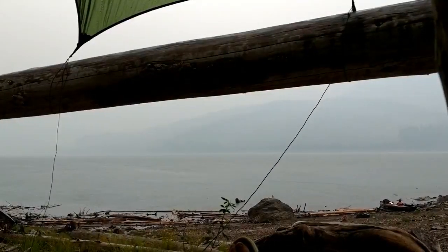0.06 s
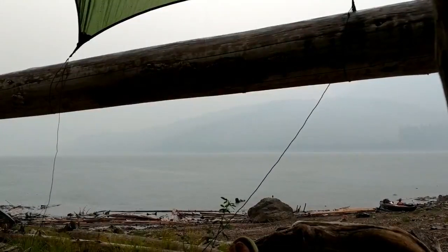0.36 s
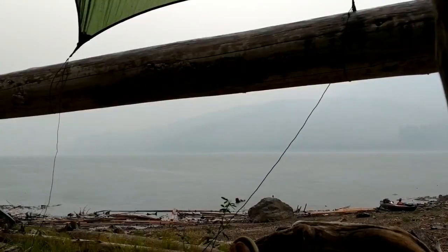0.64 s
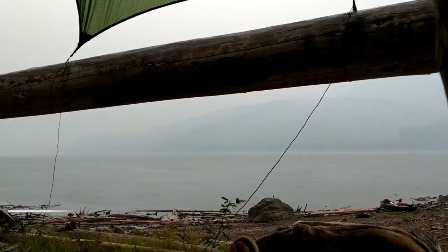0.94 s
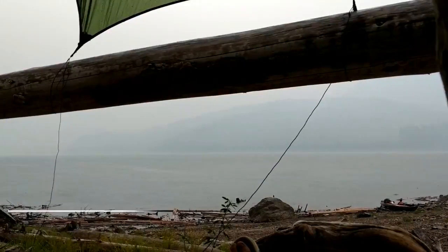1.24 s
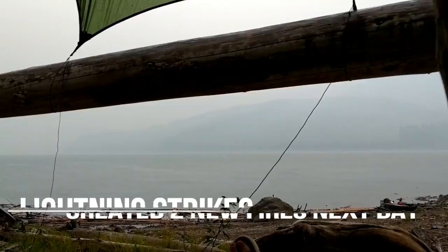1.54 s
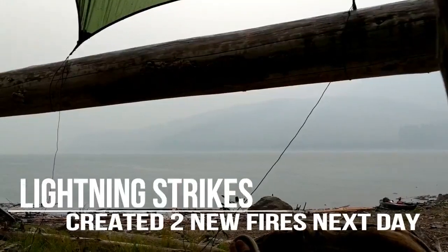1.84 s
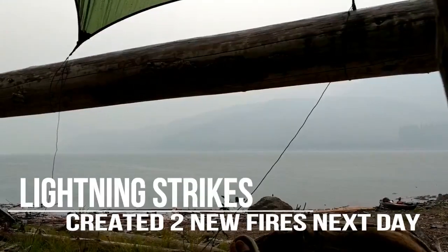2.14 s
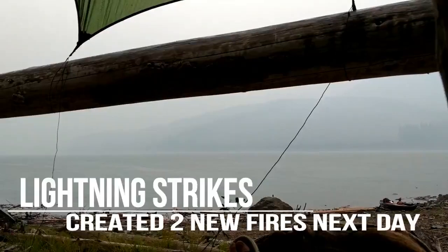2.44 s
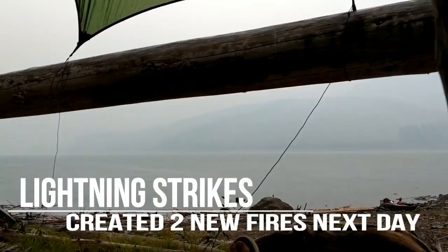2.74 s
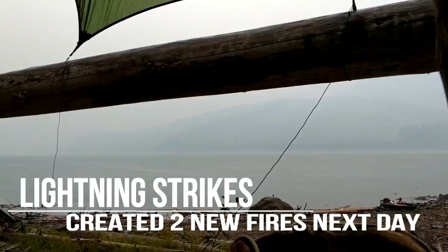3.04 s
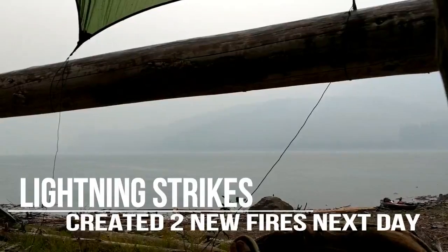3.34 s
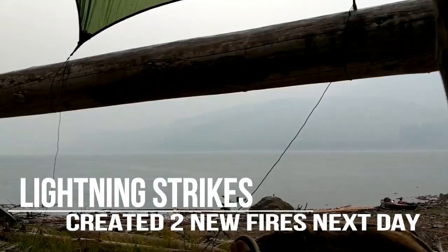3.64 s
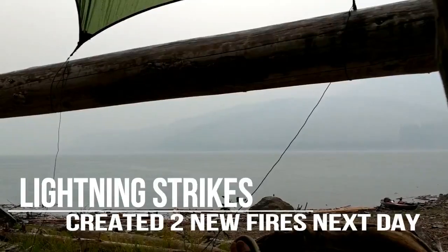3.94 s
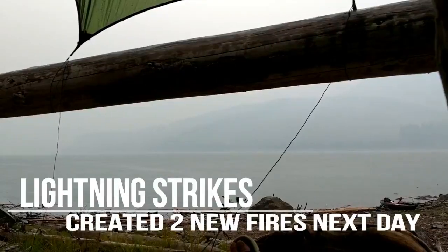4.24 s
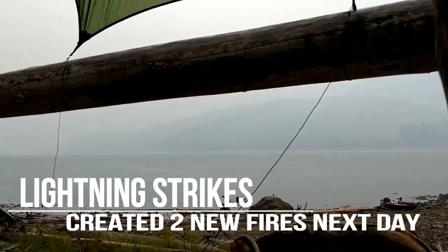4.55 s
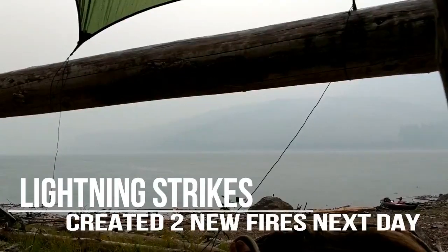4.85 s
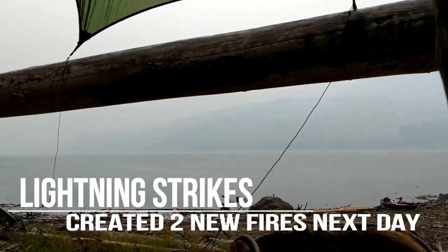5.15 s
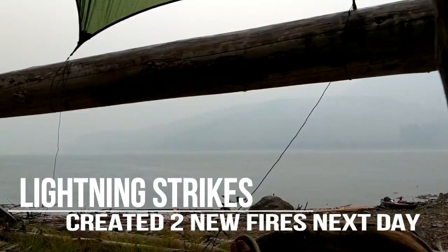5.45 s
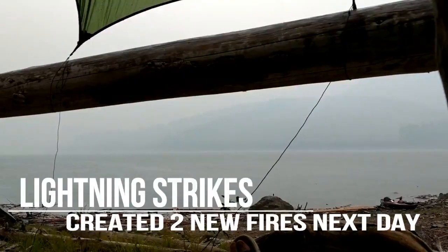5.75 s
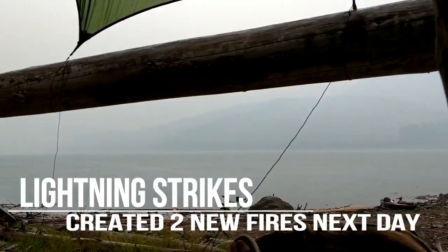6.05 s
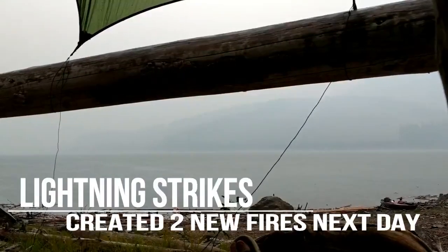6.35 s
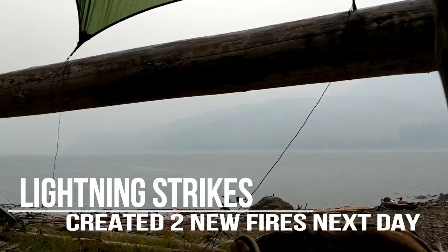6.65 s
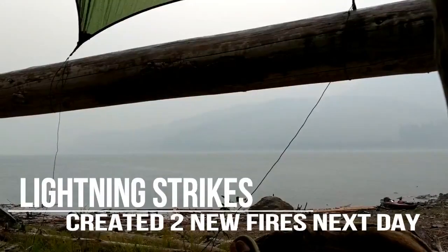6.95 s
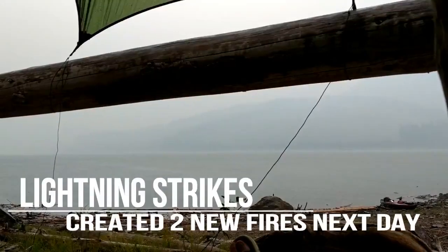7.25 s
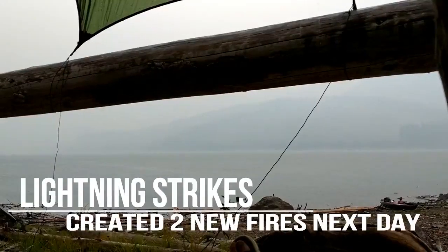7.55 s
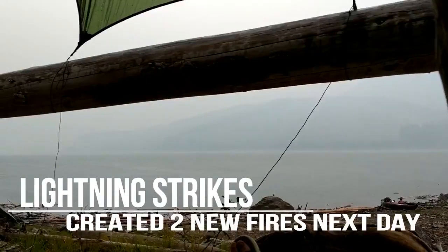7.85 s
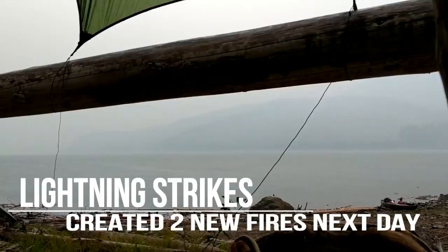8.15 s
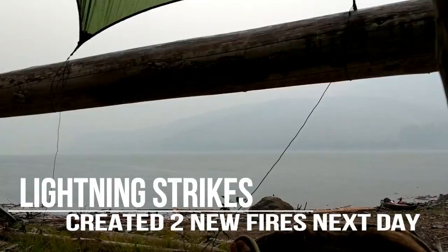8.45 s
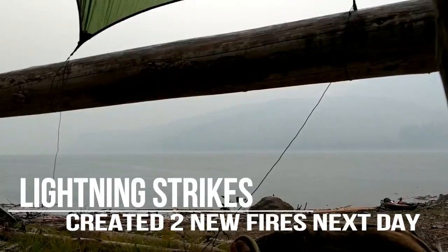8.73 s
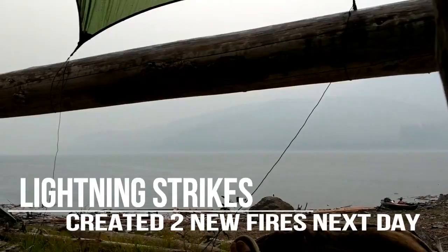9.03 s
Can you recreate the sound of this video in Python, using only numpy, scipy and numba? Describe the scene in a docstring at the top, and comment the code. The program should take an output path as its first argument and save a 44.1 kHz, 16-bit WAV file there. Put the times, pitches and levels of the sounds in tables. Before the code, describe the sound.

Close thunder breaks suddenly and rolls on in repeated swells while steady rain patters on a tarp overhead.

```python
"""Close thunder in the rain

Thunder breaks over a lake and rolls on, heard from under a tarp in steady rain.
Each kink of the lightning sends out a shock wave. These arrive as claps and as a dense roll that
swells again and again, with echoes off the hills. Raindrops tap and splash on the cloth.
A small camera widens the sound of its two microphones, and its limiter (an automatic volume
control) turns everything down, rain included, under the loudest claps."""
import sys
import numpy as np
from scipy import signal
from scipy.fft import rfft, irfft
from scipy.io import wavfile
from scipy.ndimage import uniform_filter1d
from numba import njit

SR = 44100
rng = np.random.default_rng(int(sys.argv[2]) if len(sys.argv) > 2 else 0)


def inscribe(sig):
    """Save sig as 16-bit PCM at rate SR to the path in sys.argv[1].

    A 1-D sig is mono; a 2-D sig holds one channel per row.
    Samples are clipped to [-1, 1] before scaling.
    """
    pcm = np.round(np.clip(np.atleast_2d(sig).T, -1, 1) * 32767)
    wavfile.write(sys.argv[1], SR, pcm.astype(np.int16))


N = 400869
TIME = np.arange(N) / SR
THUNDER_START_S = 1.16


def undb(db):
    """Turn decibels into a factor to multiply by."""
    return 10 ** (np.asarray(db) / 20)


def unit(x):
    """Scale a sound to an average strength (rms) of one."""
    return x / np.sqrt(np.mean(x ** 2))


def curves(table):
    """Join the rows of a timed table with straight lines, one curve per column."""
    times, *columns = np.transpose(table)
    return [np.interp(TIME, times, column) for column in columns]


def log_gains(points):
    """Join (Hz, dB) points into a curve of log gain over all frequencies."""
    hz, db = np.transpose(points)
    bins = np.linspace(0, SR / 2, 2 ** 18 + 1)
    return np.log(undb(np.interp(np.log(bins + 1), np.log(hz), db)))


def colour(x, points):
    """Shape the tone by (Hz, dB) points while keeping sudden starts sharp."""
    cepstrum = irfft(log_gains(points))
    n = len(cepstrum)
    # folding this way makes the filter ring only after a hit, never before it
    cepstrum[1:n // 2] *= 2
    cepstrum[n // 2 + 1:] = 0
    return irfft(rfft(x, n) * np.exp(rfft(cepstrum)))[..., :N]


def keep_band(x, order, hz, kind):
    """Keep the "low", "high" or middle ("band") frequencies; a higher order cuts more steeply."""
    return signal.sosfilt(signal.butter(order, hz, kind, fs=SR, output="sos"), x)


def place(at, values):
    """Add values into a silent track at the given sample positions."""
    return np.bincount(np.clip(at, 0, N).astype(int).ravel(), values.ravel(), N + 1)[:N]


def drift(turns_per_s):
    """A smooth random wobble, mostly between -1 and 1."""
    step = int(SR / turns_per_s)
    return uniform_filter1d(np.repeat(rng.standard_normal(N // step + 1), step), step)[:N]


def tint(x, depth_db=4.5, spacing_octaves=2.394):
    """Give each splash its own broad peaks and dips in tone, so no two have the same pitch."""
    spectrum = rfft(x)
    octave = np.log2(np.arange(spectrum.shape[1]) + 1)
    db = depth_db * np.cos(2 * np.pi * (octave / spacing_octaves + rng.random((len(x), 1))))
    return irfft(spectrum * unit(undb(db)), x.shape[1])


def drop_hits(times, tap_gain, hz, splash_gain, ring_cycles=1.53, give_s=0.027, splash_s=0.0062,
              thud_db=-24, thud_hz=120, droplet_share=.07, mic_lag_s=.00015, samples=900):
    """Drops hit tight cloth: a ring that sinks as the cloth gives, a soft thud, crackling droplets."""
    t = np.arange(samples) / SR
    side, lean, slack, wetness = rng.uniform(-1, 1, (len(times), 4)).T[..., None]
    cycles = hz[:, None] * give_s * np.log1p(t / give_s)
    ring = np.sin(2 * np.pi * cycles) * np.exp(-cycles / ring_cycles)
    thud = undb(thud_db) * np.sin(2 * np.pi * thud_hz * 2 ** slack * t) * (1 - t / t[-1]) ** 2
    tap = ring + thud
    droplets = rng.standard_normal(tap.shape) * (rng.random(tap.shape) < droplet_share)
    splash = tint(droplets / np.sqrt(droplet_share)) * np.exp(-t / (splash_s * 2 ** wetness))
    taps, splashes = [], []
    for mic in (1, -1):  # left, right: each drop comes from its own direction
        at = np.round(times[:, None] * SR + mic * side * mic_lag_s * SR) + np.arange(samples)
        gain = undb(mic * lean * 5.4)
        taps.append(place(at, tap * gain * tap_gain[:, None]))
        splashes.append(place(at, splash * gain * splash_gain[:, None]))
    return np.array(taps), np.array(splashes)


# The tone of splashing water: (frequency [Hz], left level [dB], right level [dB])
SPLASH_TONE = [(293, -18.5, -3), (1420, 5.5, 4), (3970, 0.5, -4.5), (4390, 2.5, 4), (5680, -3, -4.5),
               (6930, 2, -2.5), (11330, -10, -12), (12800, -13, -8), (17000, -17, -18.5)]


def spray(x):
    """Give splashes the tone that each microphone hears."""
    hz, left, right = np.transpose(SPLASH_TONE)
    return np.array([colour(x[0], np.c_[hz, left]), colour(x[1], np.c_[hz, right])])


# The tone of taps on the cloth: (frequency [Hz], level [dB])
CLOTH_TONE = [(25, -42), (45, -13), (75, 5.5), (130, 10.5), (240, 8), (480, -1), (800, -5), (1250, -1),
              (2000, -6), (3200, 7.5), (6000, -27.5), (15000, -12)]
# How hard it rains: (time [s], added level [dB])
RAIN_STRENGTH = [(0, 1), (2, 0.9), (4, 3), (5.5, 3), (7.7, 1.87), (9, 2)]


def rain(tap_db=-33, splash_db=-36.0, hiss_db=-45, tap_hz=1000, scatter_db=3.0, count=4800):
    """Many small drops and a few big ones patter overhead; the lake and shore hiss behind them."""
    when, weight, pitch, wetness = rng.random((count, 4)).T
    size = undb(-scatter_db * np.log(weight + .022))
    ring_hz = tap_hz * 2 ** (2.4 * (pitch - .5))
    taps, splashes = drop_hits(when * N / SR, size, ring_hz, size * undb(6.4 * wetness))
    patter = unit(colour(taps, CLOTH_TONE)) * undb(tap_db) + unit(spray(splashes)) * undb(splash_db)
    hiss = unit(spray(rng.standard_normal((2, N)))) * undb(hiss_db + drift(2.0))
    strength_db, = curves(RAIN_STRENGTH)
    return (patter + hiss) * undb(strength_db + drift(8.3) / 2)


# Big drops: (time [s], relative tap level [dB], starting pitch [Hz], relative splash level [dB])
BIG_DROPS = [(0.015, -19, 1460, -36.5), (0.062, -22, 1400, -34.5), (0.1625, -21, 1090, -37.5),
             (0.2203, -21.5, 1350, -37), (0.26, -20, 654, -36), (0.308, -21, 1400, -40),
             (0.4364, -16.5, 696, -29), (0.7684, -25, 1300, -31), (1.108, -10.5, 1840, -39),
             (1.6471, -16.5, 1520, -30.5), (1.8205, -27, 1250, -31), (1.902, -22, 1710, -35.5),
             (3.851, -15, 1430, -39), (5.158, -21, 1560, -34), (5.432, -18, 1500, -36),
             (5.5767, -14, 2600, -36), (5.6234, -10.5, 1680, -32.5), (5.7067, -18, 1470, -31.5),
             (6.115, -16, 1450, -46), (6.187, -18, 1740, -29), (6.388, -21, 1410, -32),
             (6.613, -15, 1480, -40), (6.835, -23, 1300, -35.5), (8.1432, -23, 1550, -38),
             (8.41, -19, 1400, -33), (8.902, -30, 1300, -29)]


def heavy_drops(tap_boost_db=3, splash_boost_db=8):
    """The biggest drops strike the tarp right above the camera."""
    times, tap_db, hz, splash_db = np.transpose(BIG_DROPS)
    taps, splashes = drop_hits(times, undb(tap_db + tap_boost_db), hz, undb(splash_db + splash_boost_db),
                               ring_cycles=0.97, give_s=0.0049, splash_s=0.012, mic_lag_s=.00004)
    return taps + spray(splashes)


def shocks(times, size, hz):
    """Shock waves shaped like an N: pressure jumps up, slides down, jumps back. Long ones sound deep."""
    at = np.round(times * SR)
    length = np.round(2 / 3 * SR / hz)
    fall = 2 * size / length
    slope = np.cumsum(place(at + length, fall) - place(at, fall))
    return np.cumsum(place(at, size) + place(at + length, size) + slope)


# What air and ground leave of a shock wave: (frequency [Hz], level [dB])
AIR_TONE = [(27, -23), (40, -18), (60, -6), (120, -2), (220, 2.5), (410, -0.5), (560, -2), (740, -5.5),
            (950, -11), (1280, -9), (2000, -25), (3500, -29.5), (8000, -79)]


def through_air(x):
    """On the way here, thunder loses most of its treble and its very deepest bass."""
    return colour(x, AIR_TONE)


def shock_stream(hz, scatter_db, count):
    """A steady stream of shock waves of uneven size and length."""
    when, size, pitch = rng.random((count, 3)).T
    times = (np.arange(count) + 4 * when) / count * N / SR
    gain = undb(-scatter_db * np.sqrt(size))
    return unit(through_air(shocks(times, gain, hz * 2 ** (1.295 * (pitch - .5)))))


def water_bounce(x, db, lag_s=0.002533):
    """A reflection off the water follows close behind and makes the thunder hollow."""
    return (x + undb(db) * np.roll(x, int(lag_s * SR), axis=-1)) / np.hypot(1, undb(db))


def tear(hz=995, lowest_hz=950, start_db=-12.5, fade_db_per_s=3):
    """The shortest shocks rip like cloth; later ones have crossed more air, which soaks them up."""
    rip = keep_band(shock_stream(hz, 16.6, count=7000), 3, lowest_hz, "high")
    return unit(rip) * undb(start_db - fade_db_per_s * (TIME - THUNDER_START_S))


def shock_powers(db, near_db, boom_db):
    """Split a mid-range level into near and far power, and set the power of the boom against it."""
    near = 1 / (1 + undb(-2 * near_db))
    return undb(2 * db) * np.array([[near], [1 - near], [undb(2 * boom_db)]])


# Swells of the roll, one for each stretch of the lightning: (peak time [s], mid-range level [dB],
# rise [s], fall [s], near over far shocks [dB], boom over mid-range [dB])
THUNDER_SWELLS = [(1.26, -26.5, 0.13, 0.13, 1, 1.5), (1.86, -30, 0.23, 0.051, -10, -4),
                  (2.16, -9.5, 0.071, 0.29, -4.5, -7), (2.6, -12.5, 0.094, 0.18, -3, -13),
                  (3.2, -14, 0.38, 0.56, 4.5, -5), (4.15, -21, 1, 0.38, 20, -2.5),
                  (4.95, -19, 0.17, 0.096, 13, -7), (5.65, -31, 0.49, 0.55, 14, -16),
                  (6.92, -20, 0.28, 0.28, 2, -1.5), (7.65, -28, 0.17, 0.13, 3, -1),
                  (8.04, -23.5, 0.15, 0.25, -16, 2), (8.46, -22.5, 0.065, 0.26, -7, 0),
                  (8.71, -20.5, 0.077, 0.067, -8, 2), (8.98, -20, 0.16, 0.18, -8.5, 2.5)]


def swells(rumble_db=-23, fade_db_per_s=1, onset_s=0.016, roundness=1.58):
    """Strength of the near, far and booming shocks: a sudden, slowly fading rumble with swells on top."""
    age = TIME - THUNDER_START_S
    power = shock_powers(rumble_db, near_db=-3, boom_db=0.5) * undb(-2 * fade_db_per_s * age)
    for peak_s, db, rise_s, fall_s, near_db, boom_db in THUNDER_SWELLS:
        off_peak = np.abs(TIME - peak_s) / np.where(TIME < peak_s, rise_s, fall_s)
        hump = np.exp(-2 * off_peak ** roundness)  # roundness 1 is pointed, 2 is a bell shape
        power = power + shock_powers(db, near_db, boom_db) * hump
    return np.sqrt(power) * np.clip(age / onset_s, 0, 1)


def thunder_roll(near_hz=620, far_hz=295, boom_hz=138, near_echo_db=-7, boom_echo_db=-6,
                 boom_lag_s=0.0002, lump_db=1.72, lumps_per_s=22):
    """Short shocks clatter, long ones boom, far ones sound duller; the hills echo from the sides."""
    near, far, booming = swells()
    sides = np.array([[1], [-1]])  # opposite in left and right, so the echoes sound wide
    bright = shock_stream(near_hz, 9.8, count=9000)
    bright = bright + sides * undb(near_echo_db) * shock_stream(near_hz, 3.8, count=9000)
    bright = keep_band(bright, 4, 1000, "low")
    dull = keep_band(shock_stream(far_hz, 11.0, count=6000), 2, [225, 520], "band")
    dull = water_bounce(dull, db=-16.0)
    mid_range = near * unit(bright) + far * unit(dull) + np.hypot(near, far) * tear()
    deep = shock_stream(boom_hz, 7.3, count=3000)
    deep_echo = sides * undb(boom_echo_db) * shock_stream(89, 3.5, count=3000)
    boom = np.array([deep, np.roll(deep, int(boom_lag_s * SR))]) + deep_echo
    boom = unit(keep_band(boom, 3, 210, "low")) * undb(-3)
    lumps = undb(lump_db * drift(lumps_per_s))  # the shocks arrive in bunches
    return (mid_range + booming * boom) * lumps


# Single claps; low ones thud, high ones crack:
# (time [s], relative level [dB], spread of arrivals [s], pitch [Hz])
THUNDER_CLAPS = [(1.171, -11.5, 0.0017, 302), (1.245, -11.5, 0.0083, 290), (1.25, -15, 0.0073, 1100),
                 (1.255, -11, 0.022, 91), (1.396, -16, 0.0043, 356), (1.462, -19, 0.0076, 330),
                 (1.603, -20, 0.0047, 270), (1.834, -12, 0.011, 106), (1.843, -7.5, .009, 430),
                 (1.846, -16, 0.0099, 1150), (2.02, -6.5, 0.014, 62), (2.024, -4, 0.0035, 398),
                 (2.109, -7.5, 0.0043, 510), (2.118, -9, 0.0056, 1100), (2.121, -1.5, 0.0026, 440),
                 (2.135, 2, 0.005, 410), (2.29, -4.5, 0.0035, 337), (2.315, -7, 0.0036, 368),
                 (2.545, -7, 0.0059, 453), (2.57, -1.5, 0.0093, 434), (2.636, -7, 0.0084, 360),
                 (2.768, -9.5, 0.013, 128), (2.851, -10.5, 0.0063, 384), (3.057, -6.5, 0.0028, 400),
                 (3.13, -8.5, .007, 484), (3.169, -6.5, 0.006, 630), (3.205, -5.5, 0.0045, 536),
                 (3.279, -10, 0.0055, 314), (3.326, -8.5, 0.0077, 189), (3.7, -11.5, 0.013, 403),
                 (3.884, -15.5, 0.011, 163), (4.223, -9.5, 0.00465, 407), (4.39, -13.5, 0.0032, 510),
                 (4.58, -14, .02, 520), (4.644, -12, 0.014, 163.6), (4.652, -12.5, 0.0091, 500),
                 (4.885, -12.5, 0.0035, 420), (4.922, -6.5, 0.0037, 420), (4.927, -8, 0.0066, 173),
                 (5.032, -13, 0.011, 198), (5.795, -16.5, .028, 210), (6.062, -17, 0.01, 208),
                 (6.308, -13, 0.031, 151), (6.652, -16, 0.0083, 200), (6.91, -11.5, 0.034, 263),
                 (8.045, -13.5, 0.014, 110), (8.678, -15, 0.013, 310), (8.681, -7, 0.012, 106)]


def thunder_claps(others_db=-1, trim_db=-0.14, bounce_db=-4, span_s=.01, count=18):
    """Each clap is one strong shock in a knot of weaker ones from the same bend of the lightning."""
    out = np.zeros(N)
    for time, db, spread_s, hz in THUNDER_CLAPS:
        delay, size, pitch = rng.standard_normal((count, 3)).T
        size = undb(others_db + size - 2 * np.abs(delay))
        delay[0], pitch[0], size[0] = 0, 0, 1  # the main shock
        knot = shocks(time + spread_s * delay, size, hz * np.exp(0.25 * pitch))
        window = slice(int((time - .15) * SR), int((time + .15) * SR))
        knot = keep_band(knot[window], 2, [0.5 * hz, 1.79 * hz], "band")
        knot = water_bounce(knot, bounce_db)
        strength = np.sqrt(np.sum(knot ** 2) / (span_s * SR))  # as if packed into span_s
        out[window] += undb(db + trim_db) * knot / strength
    return through_air(out)


# Which side the thunder comes from: (time [s], left minus right [dB])
THUNDER_SIDE = [(1.2, 1.5), (1.5, 2), (4.18, 5.5), (4.8, 2), (6.8, 3.5), (8.63, 2.0), (9.0, 5)]


def scene():
    """Thunder across the lake, a little to the left, and rain on the tarp."""
    side_db, = curves(THUNDER_SIDE)
    left_right = undb(np.array([side_db, -side_db]) / 2)
    return (thunder_roll() + thunder_claps()) * left_right + rain() + heavy_drops()


# How much of the other microphone is subtracted: (frequency [Hz], level [dB])
OTHER_MIC_SHARE = [(60, -18), (300, -8), (700, -3), (1100, -.4), (2200, -.3), (3300, -.6), (5500, -3.5),
                   (8000, -10), (11000, -26)]


def widen(x, lag_samples=20):
    """The camera widens the sound by subtracting a late copy of each microphone from the other."""
    share = np.exp(log_gains(OTHER_MIC_SHARE))
    other = irfft(rfft(x[::-1], 2 * (len(share) - 1)) * share)[:, :N]
    return x - np.pad(other, ((0, 0), (lag_samples, 0)))[:, :N]


@njit
def hold_peaks(excess, release):
    """Jump to each new peak, then sink back slowly."""
    out, held = np.empty(len(excess)), 0.
    for i in range(len(excess)):
        held = max(excess[i], held * release)
        out[i] = held
    return out


def limiter(x, ceiling_db=0, attack_s=0.0009, release_s=0.3):
    """Loud peaks turn the volume down, but a moment late, so the hardest claps clip with a snap."""
    excess_db = np.maximum(20 * np.log10(np.abs(x).max(0) + 1e-9) - ceiling_db, 0)
    held_db = hold_peaks(excess_db, np.exp(-1 / (release_s * SR)))
    lag = np.exp(-1 / (attack_s * SR))
    cut_db = signal.lfilter([1 - lag], [1, -lag], held_db)
    return np.clip(x * undb(-cut_db), -1, 1)


def record(dry, top_hz=16000):
    """The camera widens the sound, holds down its peaks and cuts off the highest treble."""
    treble_cut = signal.ellip(10, .2, 80, top_hz, fs=SR, output="sos")
    return signal.sosfilt(treble_cut, limiter(widen(dry)))


dry = scene()
out = record(dry)
inscribe(out)
```